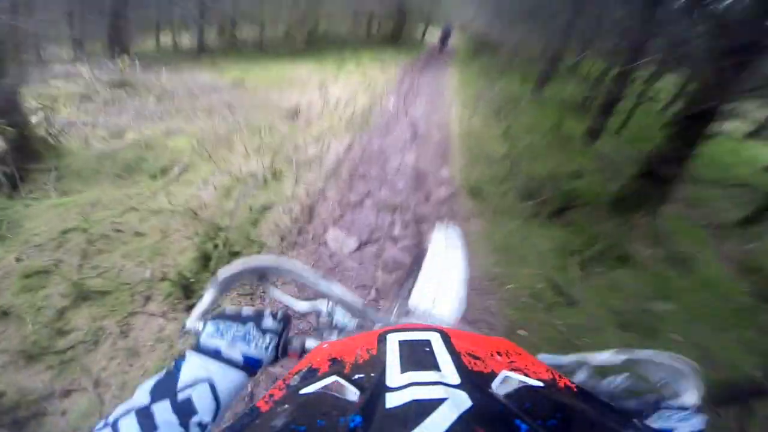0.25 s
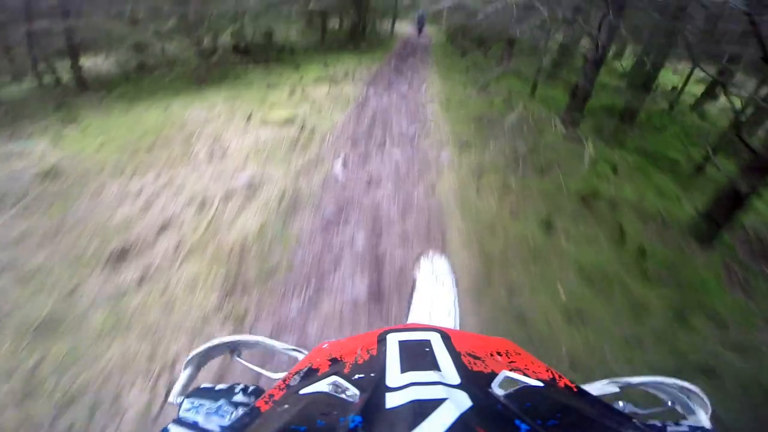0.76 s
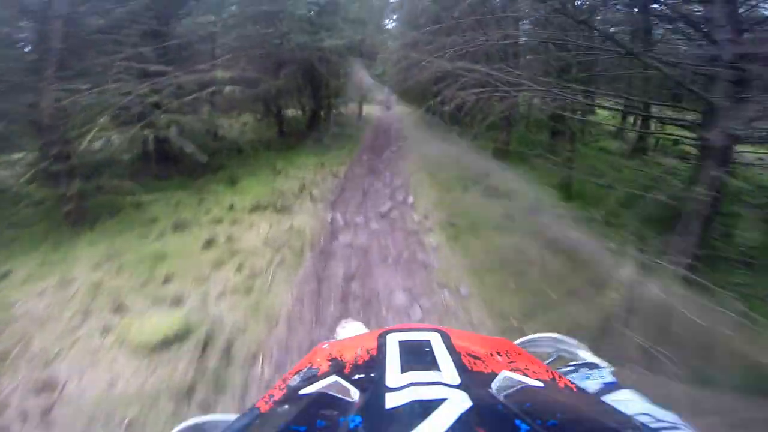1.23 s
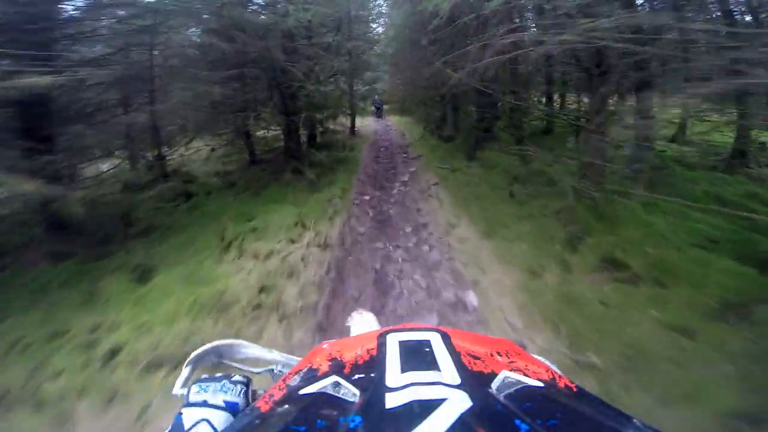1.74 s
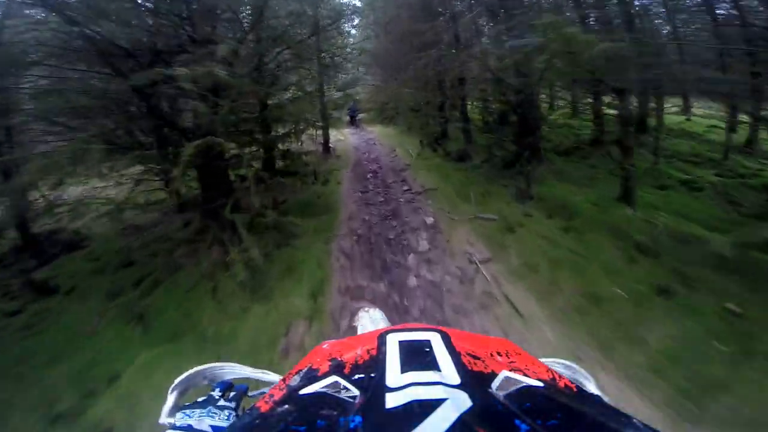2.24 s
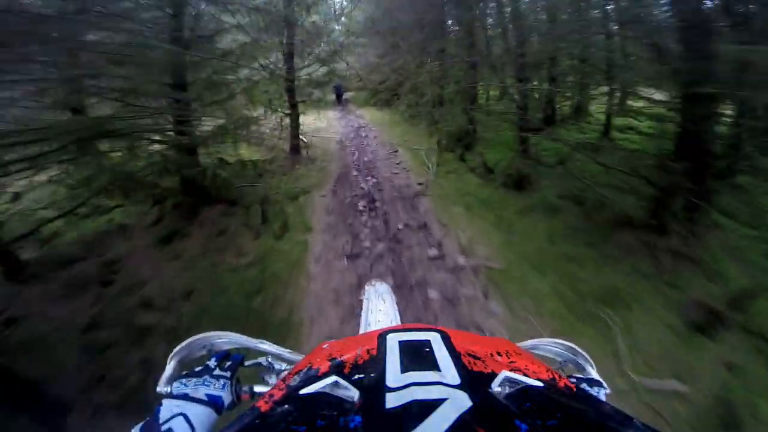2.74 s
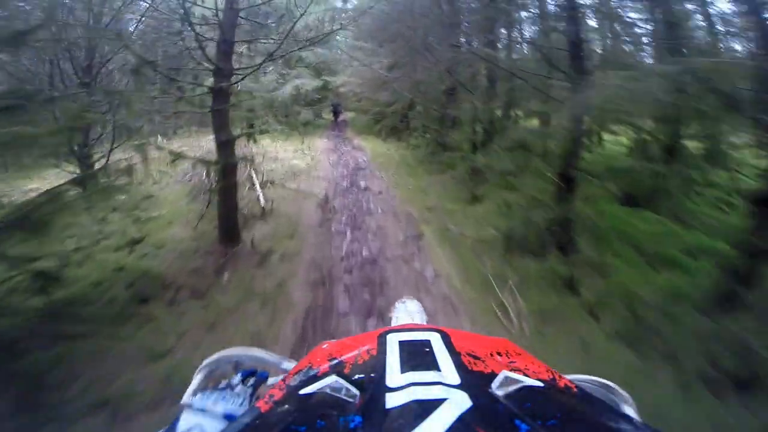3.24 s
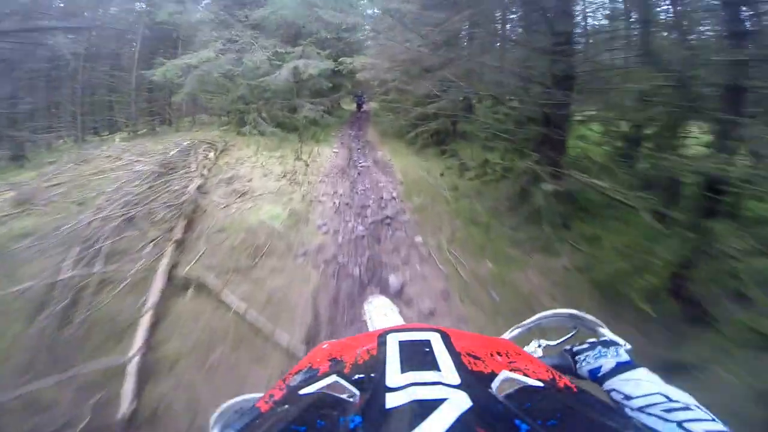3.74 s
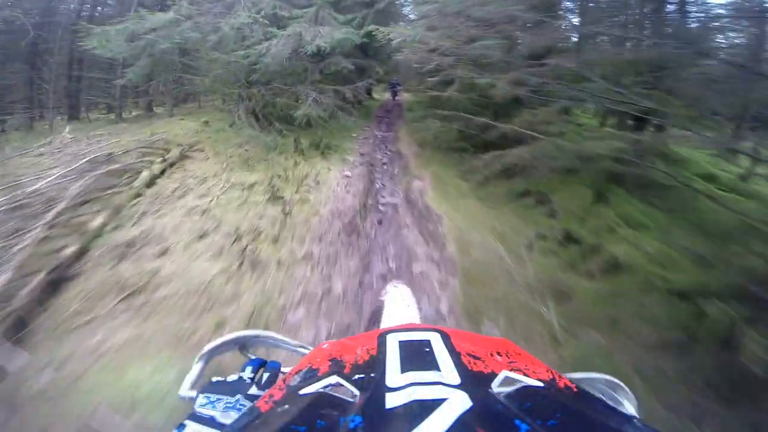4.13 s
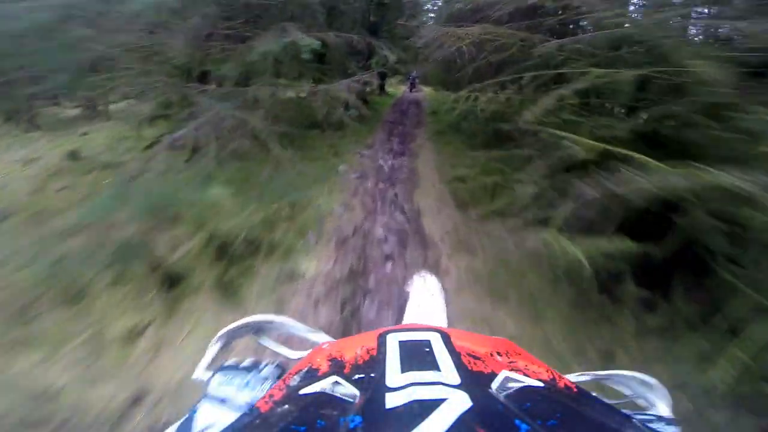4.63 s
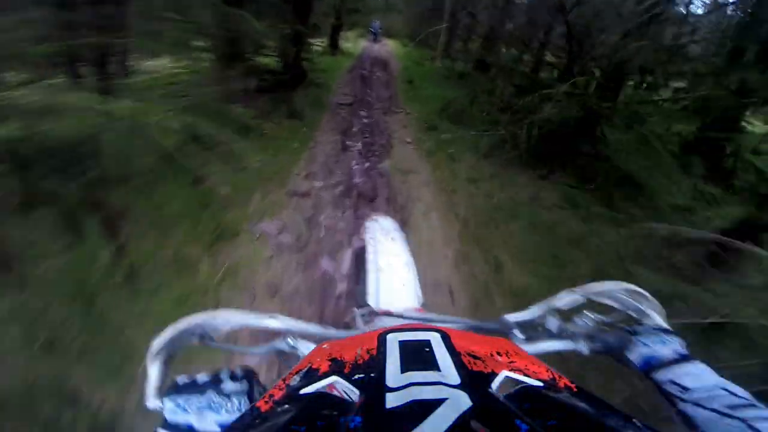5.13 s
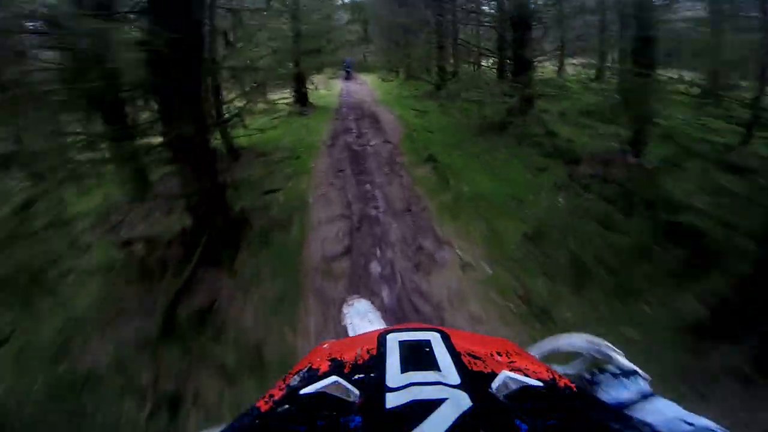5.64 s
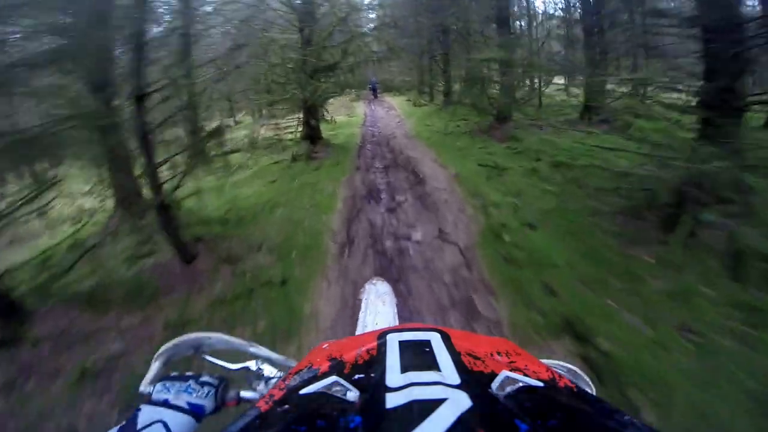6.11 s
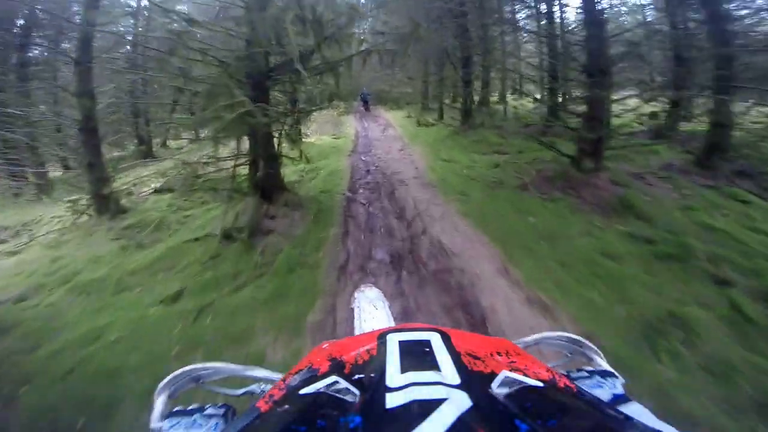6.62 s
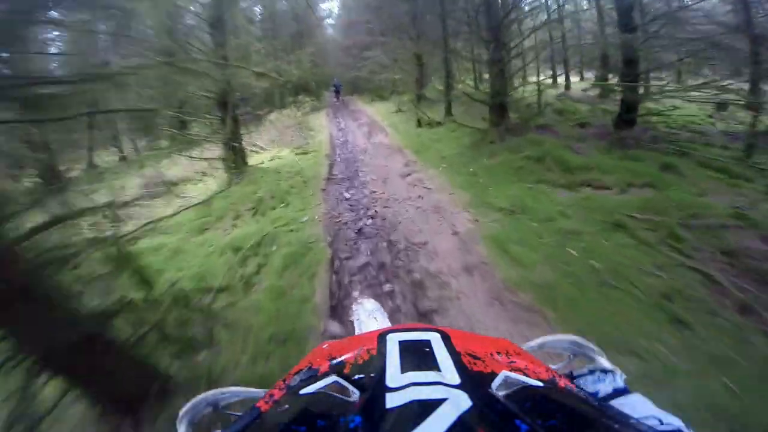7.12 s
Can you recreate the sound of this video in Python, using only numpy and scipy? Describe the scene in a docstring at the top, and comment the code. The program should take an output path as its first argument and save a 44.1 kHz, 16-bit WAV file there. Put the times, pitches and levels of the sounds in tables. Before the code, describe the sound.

Heard close from a helmet microphone, a four-stroke off-road motorbike runs with a pulsing exhaust and metallic ticking, swelling and easing in short bursts. Tyres rumble on stony ground and wind thumps the microphone. Low branches hit with sharp, hollow plastic cracks and scraping twigs, twice in quick succession near the start, then three more times, spaced apart. Each hard blow briefly pushes down the engine sound, which then recovers.

```python
"""A single-cylinder four-stroke dirt bike on a rough forest trail, heard from a helmet camera.
From the start the exhaust thuds, the engine clatters, tyres rumble and wind buffets the microphone.
At 0.55 s low branches crack on the camera case and twigs scrape over a short low rumble. At 1.2 s more
branches hit, one slaps along the visor and the engine drone swells; further hard blows land near 2.9,
5.2 and 7.2 s. Each hard blow ducks the camera's limiter; the engine comes back over a second or so."""
import sys
import numpy as np
from scipy import signal
from scipy.fft import rfft, irfft, next_fast_len
from scipy.io import wavfile
from scipy.ndimage import uniform_filter1d, minimum_filter1d, map_coordinates

SR = 44100
rng = np.random.default_rng(int(sys.argv[2]) if len(sys.argv) > 2 else 0)


def wrap_up_sound(samples):
    """Save the sound to the file named by the first command line argument, as 16-bit audio."""
    columns = np.atleast_2d(samples).T
    # keep every value between -1 and 1, then stretch to whole-number steps
    tamed = np.clip(columns, -1, 1)
    steps = np.round(tamed * 32767).astype(np.int16)
    wavfile.write(sys.argv[1], SR, steps)


N = 325017


def amp(db):
    """Decibels to gain."""
    return 10 ** (np.asarray(db) / 20)


def unit(x):
    """x at rms 1."""
    return x / np.sqrt(np.mean(x ** 2) + 1e-20)


def curve(rows):
    """(seconds, value) rows interpolated to every sample."""
    return np.interp(np.arange(N) / SR, *np.transpose(rows))


def wobble(rate_hz):
    """Smooth random curve, rms about 1, with rate_hz knots a second."""
    knots = rng.standard_normal(int(N * rate_hz / SR) + 4)
    return map_coordinates(knots, [np.arange(N) * rate_hz / SR])


def swell(centre_s, sigma_s):
    """Bell-shaped envelope, peak 1."""
    return np.exp(-((np.arange(N) / SR - centre_s) / sigma_s) ** 2 / 2)


def add(out, start_s, x):
    """Mix x into out from start_s on."""
    part = out[round(start_s * SR):][:len(x)]
    part += x[:len(part)]


def colour(x, spectrum):
    """x through a minimum-phase filter given as (Hz, dB) rows."""
    size = 2 * next_fast_len(len(x) // 2 + 4096)
    hz, db = np.transpose(spectrum)
    bin_db = np.interp(np.log(np.fft.rfftfreq(size, 1 / SR) + 1), np.log(hz), db)
    cepstrum = irfft(np.log(amp(bin_db)))
    cepstrum[1:size // 2] *= 2
    cepstrum[size // 2 + 1:] = 0
    return irfft(rfft(x, size) * np.exp(rfft(cepstrum)))[:len(x)]


def resonate(x, hz, width_hz):
    """x through one resonance of peak gain 1."""
    return signal.lfilter(*signal.iirpeak(hz, hz / width_hz, SR), x)


def resonate_twice(x, hz, width_hz):
    """The same resonance twice, for steeper skirts."""
    return resonate(resonate(x, hz, width_hz), hz, width_hz)


def cycle_pulses(cycles, scatter_db, jitter_s):
    """One impulse per engine cycle, uneven in size and timing."""
    at = np.flatnonzero(np.diff(np.floor(cycles)))
    size, late = rng.standard_normal((len(at), 2)).T
    at = np.clip(at + late * jitter_s * SR, 0, N - 1).astype(int)
    return np.bincount(at, amp(scatter_db * size), N)


def puffs(pulses, decay_s):
    """A decaying burst of noise after each pulse."""
    envelope = signal.lfilter([1], [1, -np.exp(-1 / (decay_s * SR))], pulses)
    return unit(envelope * rng.standard_normal(N))


def pipe_note(cycles):
    """Each firing rings a short, round note in the silencer, higher as the gas heats up."""
    # Each row: time in seconds, pitch in Hz.
    pitch = [(0, 664), (2.5, 674), (3.7, 661), (4.3, 682), (5.1, 677), (5.85, 700), (6.4, 693), (7, 702)]
    rise_s, lag_s, scatter_db, detune_share = .004, .002, 1.7, .006
    out, t = np.zeros(N), np.arange(SR // 25) / SR
    note_hz = curve(pitch)
    envelope = (t / rise_s * np.exp(-t / rise_s)) ** 2
    for i in np.flatnonzero(np.diff(np.floor(cycles))):
        size, detune = rng.standard_normal(2)
        hz = note_hz[i] * (1 + detune_share * detune)
        add(out, i / SR + lag_s, amp(scatter_db * size) * envelope * np.sin(2 * np.pi * hz * t))
    return unit(out)


def exhaust(cycles, thud_db, bark_db):
    """Each firing sends a pulse through the silencer: a low thud, and a bark of pipe note and gas."""
    # Each row of both: frequency in Hz, relative level in dB.
    thud_spectrum = [(30, -28.5), (43, -3.5), (60, -2), (82, 1), (122, -14), (155, 2.5), (173, -4.5),
                     (192, 4.5), (214, -3.5), (240, 7.5), (260, 6), (280, -2.5), (300, -2), (335, -13),
                     (390, -7.5), (435, -5), (490, -10.5), (560, -30), (700, -13.5), (1500, -92)]
    gas_spectrum = [(200, -31), (400, -14), (520, -5), (590, -20), (645, 7.5), (690, 9), (750, -5.5),
                    (860, -5), (1100, -27), (1400, -9), (1900, -25), (4000, -74)]
    turbulence_share, puff_s, gas_db = .1, .009, -13
    pulses = cycle_pulses(cycles, scatter_db=.9, jitter_s=.00005)
    thud = colour(unit(pulses) + turbulence_share * puffs(pulses, puff_s), thud_spectrum)
    note = pipe_note(cycles)
    gas = unit(colour(puffs(pulses, puff_s), gas_spectrum))
    return amp(thud_db) * unit(thud) + amp(bark_db) * unit(note + amp(gas_db) * gas)


def clatter(cycles, level_db):
    """Valves and piston tick once a cycle over the rush of gears, chain and intake."""
    # Each row: frequency in Hz, relative level in dB.
    spectrum = [(100, -6), (450, -2.5), (620, -2.5), (950, -7.5), (1200, -6.5), (1500, -2.5), (2050, -8),
                (2450, -5), (3350, -0.5), (3750, -10.5), (4800, -20), (5500, -16.5), (7000, -23),
                (10300, -35), (13000, -50), (16000, -70)]
    # Each row: resonance in Hz, width in Hz, gain in dB.
    casing_modes = [(1470, 140, -7), (2427, 58, 2), (2836, 133, -3.5), (3350, 81, -21), (5430, 78, -7.5),
                    (6850, 210, -1), (10100, 350, -2)]
    valves = puffs(cycle_pulses(cycles + .4, scatter_db=1.8, jitter_s=.0006), decay_s=.004)
    piston = puffs(cycle_pulses(cycles + .85, scatter_db=3, jitter_s=.00011), decay_s=.0037)
    ticks = signal.lfilter(*signal.butter(2, 6000, fs=SR), .33 * valves + .25 * piston)
    rush = rng.standard_normal(N) * amp(1.84 * wobble(rate_hz=30))
    metal = colour(rush + ticks, spectrum)
    casing = sum(amp(db + 1.7 * wobble(rate_hz=6.3)) * resonate(metal, hz, width_hz)
                 for hz, width_hz, db in casing_modes)
    # The cylinder head rattles at one level whatever the load.
    head = resonate_twice(.5 * valves + rng.standard_normal(N), hz=1450, width_hz=620)
    return amp(level_db) * unit(metal + casing) + amp(-44) * unit(head)


def engine():
    """Speed sets the firing rate; load raises the bark most, the thud less, the clatter least."""
    # Each row: time in seconds, firings per second.
    speed = [(0, 40), (.12, 38.2), (.27, 41), (.35, 40.1), (.46, 42.5), (.62, 42), (.9, 39), (1.1, 37),
             (1.44, 35.5), (1.62, 37.8), (1.78, 34.7), (1.95, 37.6), (2.06, 40.2), (2.16, 36.1),
             (2.26, 38.3), (2.38, 38.7), (2.52, 40.3), (2.6, 39), (2.67, 40.5), (2.88, 42), (3.06, 38.2),
             (3.14, 40.1), (3.2, 43.7), (3.32, 44.8), (3.4, 40.9), (3.46, 42.6), (3.6, 40.7), (3.74, 46.3),
             (3.88, 42), (3.98, 45), (4.12, 41.2), (4.18, 43.5), (4.3, 44.1), (4.36, 42.4), (4.44, 43.4),
             (4.52, 40.4), (4.78, 44.1), (4.9, 40.6), (5.03, 40.4), (5.14, 42.3), (5.3, 43), (5.36, 40.6),
             (5.5, 42.5), (5.62, 40.5), (5.72, 41.5), (5.8, 43), (5.9, 46.2), (5.98, 38.4), (6.1, 36.1),
             (6.28, 38.5), (6.36, 43.4), (6.44, 38.6), (6.54, 35.8), (6.6, 37.3), (6.92, 36.6), (7, 41.2),
             (7.12, 36.6), (7.3, 35.7), (7.37, 37.3)]
    # Each row: time in seconds, load in dB (0 is a firm throttle).
    throttle = [(0, -7.5), (.32, -12.5), (.5, -15.5), (.85, -12), (1.05, -14), (1.2, -11), (1.45, -1.5),
                (1.6, -2), (1.75, -7), (1.95, -2), (2.4, 1), (2.72, 1), (2.88, -9.5), (3.1, 5.5), (3.2, 0),
                (3.45, 5), (3.66, 3), (3.77, 0), (3.9, 0), (4.0, 1.5), (4.1, 1), (4.28, -2), (4.55, -1.5),
                (4.8, 1), (4.95, -5.5), (5.08, 0.5), (5.3, -7.5), (5.48, -11), (5.58, -24.5), (5.65, -4),
                (5.76, -6), (5.86, -1.5), (5.98, -8.5), (6.1, -6.5), (6.25, -3), (6.37, 1), (6.52, -5.5),
                (6.8, -3), (7.02, 0), (7.15, -3.5), (7.37, -2.5)]
    firing_hz = curve(speed) * (1 + .002 * wobble(rate_hz=14))  # the ground shakes the speed
    cycles = np.cumsum(firing_hz) / SR
    load_db = curve(throttle)
    pipe = exhaust(cycles, thud_db=-30.5 + .84 * load_db, bark_db=-35 + load_db)
    return pipe + clatter(cycles, level_db=-29.5 + .44 * load_db)


def tyres():
    """The tyres rumble unevenly, louder where the ground is stony."""
    # Each row: time in seconds, level in dB.
    ground = [(0, -42.5), (1.0, -36.5), (2.0, -34), (2.6, -46), (3.5, -47), (4.2, -39.5), (5.0, -41),
              (5.5, -42), (5.85, -49), (6.15, -37), (6.37, -36.5), (6.55, -36.5), (6.85, -39), (7.0, -39.5),
              (7.37, -33)]
    # Each row: frequency in Hz, relative level in dB.
    spectrum = [(40, 2), (100, 6), (220, 7), (330, 4), (560, -4.5), (900, -9), (2000, -42)]
    level_db = curve(ground) + 1.7 * wobble(rate_hz=24)
    return amp(level_db) * unit(colour(rng.standard_normal(N), spectrum))


def wind():
    """Slow lumps of air pressure on the microphone port, swelling in gusts."""
    # Each row: centre in seconds, rms level in dB, sigma in seconds.
    gusts = [(0.21, -27.5, 0.07), (0.503, -14, 0.011), (0.544, -3.5, 0.019), (1.233, -4, 0.014),
             (2.684, -29.5, 0.013), (3.183, -32.5, 0.04), (4.476, -22, 0.019), (5.016, -17, 0.037),
             (5.593, -27, 0.016), (6.6, -31, 0.042), (7.14, -26, 0.029)]
    # Each row: frequency in Hz, relative level in dB.
    spectrum = [(1, -18), (5, -10.5), (10, 2), (25, -8.5), (40, -12.5), (65, -27), (120, -28.5), (300, -57),
                (1000, -77)]
    steady_db, drift_db = -31, 3.5
    strength = amp(steady_db + drift_db * wobble(rate_hz=2.52))
    strength += sum(amp(db) * swell(centre_s, sigma_s) for centre_s, db, sigma_s in gusts)
    return strength * unit(colour(rng.standard_normal(N), spectrum))


def contact(t60_s):
    """Wood hits plastic: a flat burst, coloured by three resonances of the spot and by the case."""
    # Each row: frequency in Hz, gain in dB.
    case_response = [(40, -28), (200, -19.5), (550, -15), (1150, -6.5), (1900, -6.5), (3000, 0), (3700, -5),
                     (4800, -13), (5700, -14), (7500, -21.5), (10000, -34), (13000, -38.5), (16000, -46)]
    attack_s, spread_oct, spot_db = .0003, .3, 2
    t = np.arange(SR // 5) / SR
    fade = amp(-60 * t / t60_s)
    bins = rfft(rng.standard_normal(len(t)) * fade * (1 - np.exp(-t / attack_s)))
    flat = irfft(bins / (np.abs(bins) + 1e-9), len(t)) * fade ** .25
    spot_hz = np.geomspace(1250, 3000, 3) * 2 ** rng.uniform(-spread_oct, spread_oct, size=3)
    spot = sum(resonate(flat, hz, width_hz=190) for hz in spot_hz)
    return colour(flat + amp(spot_db) * spot, case_response)


def blow(t60_s, body_hz, body_db, snap_db, thump_db, ring_db):
    """One contact, peak 1: it cracks on the hollow camera case, rings its wall and thumps the helmet."""
    # Each row: frequency in Hz, level in dB, t60 in seconds.
    helmet_modes = [(135, -3, 0.024), (115.6, -21, 0.31), (252.5, -26.5, 0.23), (312, 2, 0.0091),
                    (528, 3, 0.0099)]
    # Cavities of the case. Each row: resonance in Hz, width in Hz, gain in dB.
    hollows = [(1710, 200, -1), (1946, 38, -8.5), (2440, 390, -5.5), (3220, 140, -11)]
    wall_hz, wall_t60_s, crest_factor = 1828, .16, 2.3
    burst = contact(t60_s)
    t = np.arange(len(burst)) / SR
    hollow = sum(amp(db) * resonate(burst, hz, width_hz) for hz, width_hz, db in hollows)
    body = resonate_twice(burst, body_hz, width_hz=.33 * body_hz)
    snap = signal.lfilter(*signal.butter(2, 6000, "high", fs=SR), burst)
    crack = burst + hollow + amp(body_db) * body + amp(snap_db) * snap
    loudest_rms = np.sqrt(uniform_filter1d(crack ** 2, size=88).max())
    crack = np.tanh(crack / (crest_factor * loudest_rms))  # rounds off the peaks
    ring = lambda hz, ring_t60_s: np.sin(2 * np.pi * hz * t) * amp(-60 * t / ring_t60_s)
    thump = sum(amp(db) * ring(hz, ring_t60_s) for hz, db, ring_t60_s in helmet_modes)
    hit = crack / np.abs(crack).max() + amp(thump_db) * thump + amp(ring_db) * ring(wall_hz, wall_t60_s)
    return hit / np.abs(hit).max()


def branches():
    """Each branch strikes the camera case, then slaps back with a lighter crack."""
    # Each row: start in seconds, peak in dB, t60 in seconds, resonance of the struck spot in Hz,
    # then gains in dB of that resonance, treble snap, helmet thump, wall ring and rebound.
    strikes = [ (0.5455, 24, 0.019, 610, 3, 2, -11.5, -24, -39),
               (0.5482, 22.5, 0.0073, 1480, 6, 5, -19.5, -29, -12),
               (0.6167, 10.5, 0.018, 1900, 9, 1, -11, -32, -5),
               (0.6296, 10.5, 0.026, 2450, -5, 4, -24, -30, -19),
               (0.6405, 14, 0.017, 1540, 9, 3, -26, -33, -15),
               (0.6969, 6.5, 0.021, 2780, -3, -1, -52, -28, -24),
               (1.2249, 23.5, 0.017, 616, 12, 3, -11, -24, -27.5),
               (1.2274, 22, 0.012, 1850, 0, -2, -22, -21, -22),
               (1.238, 13.5, 0.023, 2430, 5, 4, -13, -24, -21),
               (1.3287, 26.5, 0.011, 1830, 0.5, -1, -20.5, -32, -23),
               (2.776, 16, 0.013, 2030, -1.5, 9, -14.5, -32, -7.5),
               (2.9469, 25.5, 0.015, 3160, -9, 6, -4, -36, -25),
               (2.9557, 21.5, 0.01, 3050, -2.5, 9.5, -21.5, -37, -16.5),
               (3.0177, 2, 0.03, 2060, 10, -30, -16, -19, -14),
               (3.277, -7.5, 0.036, 8300, 19.5, 9, -7, -40, -2),
               (4.821, -14, 0.015, 3400, 16, 5, -28, -40, -9),
               (5.1561, 6.5, 0.0083, 3030, 3, 13, -46, -30, -13),
               (5.1607, 15.5, 0.0061, 3050, -6, 13, -36, -39, -19),
               (5.174, 7, 0.019, 1210, 7, -16, -30, -18.5, -27),
               (5.362, -13.5, 0.011, 3070, 13, 8, -29, -38, -29),
               (6.8749, -6.5, 0.013, 1660, 9, -29, -38, -34, -30),
               (7.2101, 24, 0.011, 1820, 17, 2, -24, -26.5, -29)]
    rebound_delay_s, rebound_t60_s = .0095, .018
    out = np.zeros(N)
    for start_s, db, t60_s, hz, body_db, snap_db, thump_db, ring_db, rebound_db in strikes:
        add(out, start_s, amp(db) * blow(t60_s, hz, body_db, snap_db, thump_db, ring_db))
        rebound = blow(rebound_t60_s, hz, body_db, snap_db, thump_db=-20.5, ring_db=-39)
        add(out, start_s + rebound_delay_s, amp(db + rebound_db) * rebound)
    return out


def twigs():
    """A twig flicks the helmet once, or drags, catching and slipping in an uneven run of ticks."""
    # Each row: start in seconds, peak in dB, resonance in Hz.
    flicks = [(0.691, 0, 1730), (0.7085, -9, 2497), (0.7559, 3, 2800), (1.352, 11, 2290),
              (1.3583, 3.5, 1250), (1.3626, 7.5, 1900), (1.367, 10, 2440), (2.811, -14.5, 2400),
              (5.208, -11, 2800), (5.231, -8.5, 2800), (5.258, -13, 3000), (5.2858, -8, 2600)]
    # Each row: start in seconds, length in seconds, typical tick peak in dB, resonance in Hz.
    scrapes = [(0.558, .018, -1, 1500), (0.583, .03, -1, 1800), (0.616, .048, 4.5, 1900),
               (.731, .022, -0.5, 2630), (1.2179, .005, 10, 3300), (1.305, .02, 4, 2300),
               (1.334, .014, 0, 1990), (5.26, .014, -9.5, 2120)]
    ticks_per_s, uneven_share, scatter_db, scatter_oct = 380, .79, 2.5, .27
    tick = lambda hz, t60_s: blow(t60_s, hz, body_db=-5, snap_db=-3, thump_db=-43, ring_db=-38)
    out = np.zeros(N)
    for start_s, db, hz in flicks:
        add(out, start_s, amp(db) * tick(hz, t60_s=.01))
    for start_s, length_s, db, hz in scrapes:
        count = int(np.ceil(length_s * ticks_per_s))
        for k in range(count):
            tick_s = start_s + (k + uneven_share * rng.uniform(-.5, .45)) / ticks_per_s
            pressure = np.sqrt(np.sin(np.pi * (k + .5) / count))
            gain = pressure * amp(db + scatter_db * rng.standard_normal())
            tick_hz = hz * 2 ** (scatter_oct * rng.standard_normal())
            add(out, tick_s, gain * tick(tick_hz, t60_s=.0055))
    return out


def low_swells():
    """Narrow bands of noise: short low rumbles, and at 1.3 s a swell of engine drone near 250 Hz."""
    # Each row: centre in seconds, rms level in dB, sigma in seconds, resonance in Hz, width in Hz.
    swells = [(0.598, -2, 0.024, 116, 61), (5.25, -22.5, 0.061, 122, 60), (5.706, -23.5, 0.037, 239, 70),
              (3.04, -17, .022, 100, 30), (4, -24.5, .04, 250, 46), (1.305, -14.5, 0.049, 253, 115)]
    out = np.zeros(N)
    for centre_s, db, sigma_s, hz, width_hz in swells:
        band = unit(resonate_twice(rng.standard_normal(N), hz, width_hz))
        out += amp(db) * swell(centre_s, sigma_s) * band
    return out


def visor():
    """A branch slaps along the thin visor, which clacks at its own resonances."""
    # Each row: start in seconds, peak in dB, contact t60 in seconds.
    slaps = [(1.271, 19, 0.011), (1.2789, 14.5, 0.032), (1.2999, 18, 0.028), (1.3096, 14, 0.041),
             (1.319, 19, 0.028)]
    # Each row: resonance in Hz, width in Hz, gain in dB.
    modes = [(860, 150, 18.5), (1040, 89, -3), (2280, 130, 3), (4170, 200, 11), (5480, 200, 11)]
    out = np.zeros(N)
    for start_s, peak_db, t60_s in slaps:
        burst = contact(t60_s)
        clack = burst + sum(amp(db) * resonate(burst, hz, width_hz) for hz, width_hz, db in modes)
        add(out, start_s, amp(peak_db) * clack / np.abs(clack).max())
    return out


def scene():
    """All sources at the helmet, mono."""
    return (engine() + tyres() + wind() + low_swells() + branches() + visor() + twigs())[None]


def limiter(x, ceiling_db, release_db_per_s, start_gain_db, ahead_s):
    """The gain drops just ahead of each peak over the ceiling, then climbs back."""
    climb_db = release_db_per_s * np.arange(N) / SR
    allowed_db = np.minimum(0, ceiling_db - 20 * np.log10(np.abs(x) + 1e-9))
    allowed_db = minimum_filter1d(allowed_db, 2 * int(ahead_s * SR) + 1)
    allowed_db[0] = start_gain_db
    gain_db = np.minimum.accumulate(allowed_db - climb_db) + climb_db
    return x * amp(uniform_filter1d(gain_db, size=64))


def record(dry):
    """The camera limits, clips what is still too loud and cuts off above 16 kHz."""
    limited = limiter(dry[0], ceiling_db=4.5, release_db_per_s=16.5, start_gain_db=-14.5, ahead_s=.0114)
    lowpass = signal.ellip(N=10, rp=.1, rs=100, Wn=16000, fs=SR, output="sos")
    return signal.sosfilt(lowpass, np.clip(limited, -.95, .95))[None]


dry = scene()
out = record(dry)
wrap_up_sound(out)
```